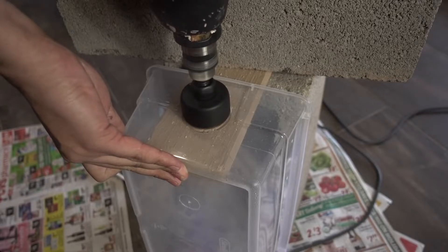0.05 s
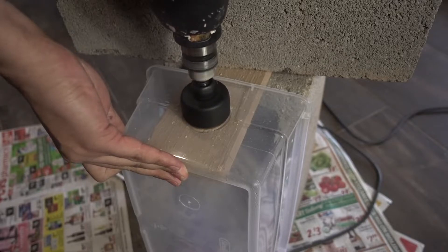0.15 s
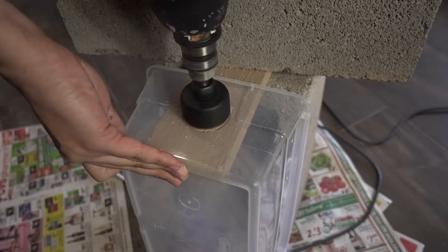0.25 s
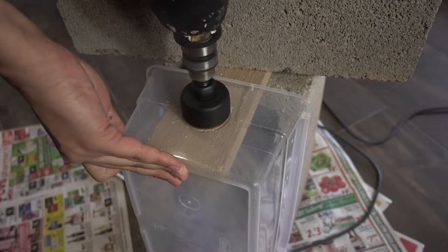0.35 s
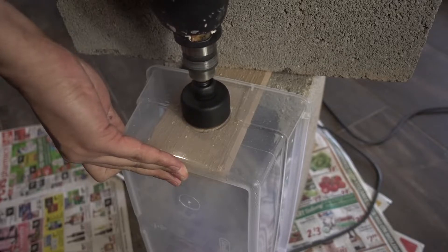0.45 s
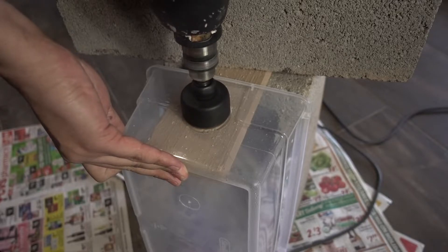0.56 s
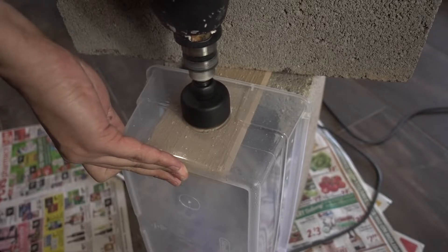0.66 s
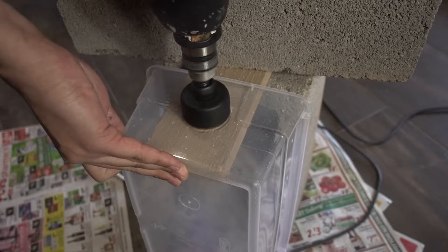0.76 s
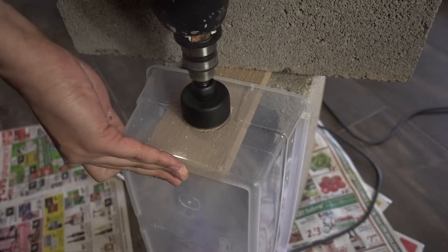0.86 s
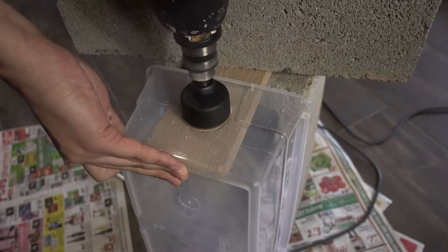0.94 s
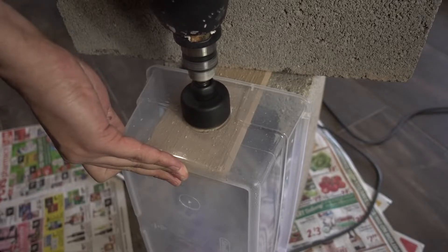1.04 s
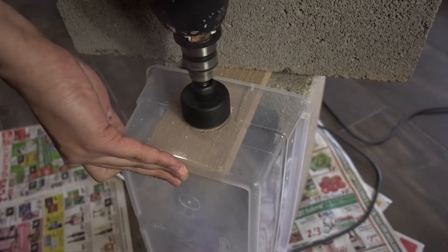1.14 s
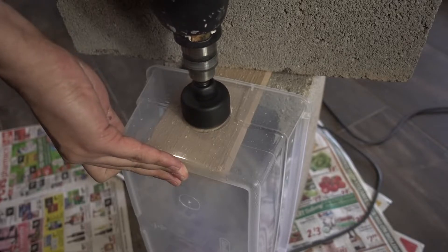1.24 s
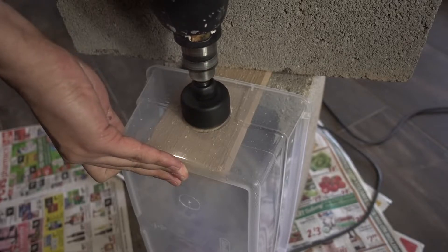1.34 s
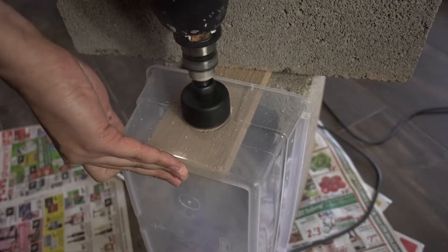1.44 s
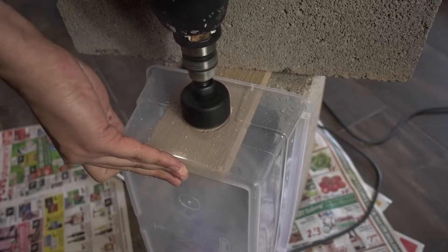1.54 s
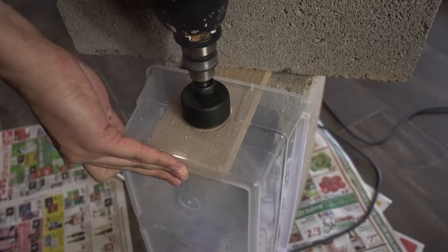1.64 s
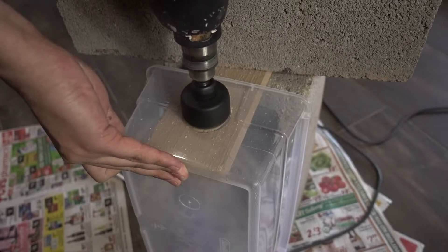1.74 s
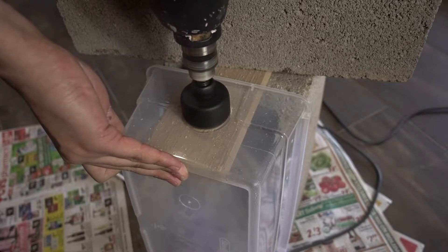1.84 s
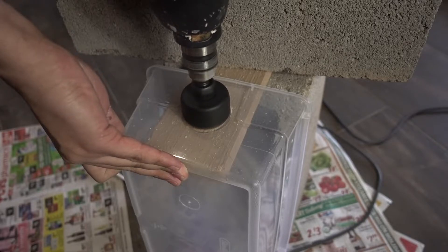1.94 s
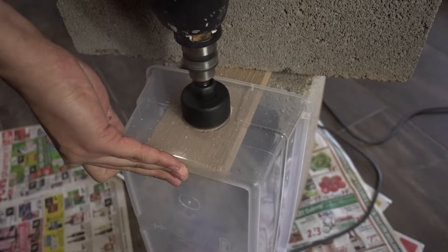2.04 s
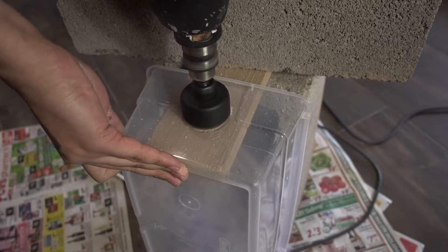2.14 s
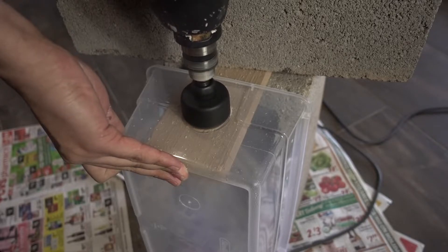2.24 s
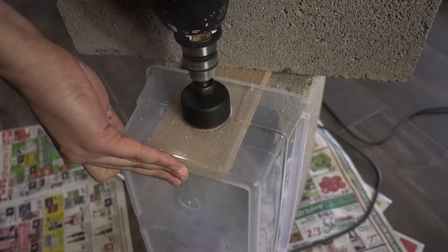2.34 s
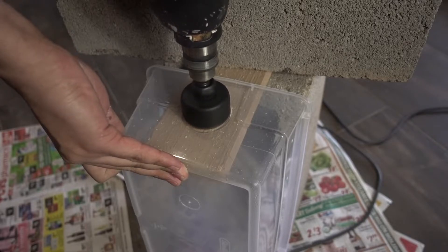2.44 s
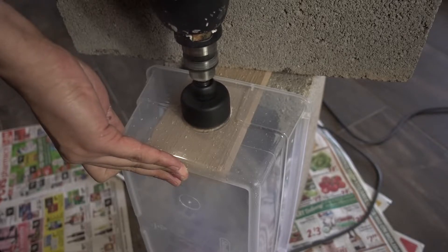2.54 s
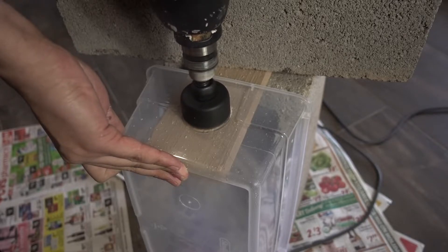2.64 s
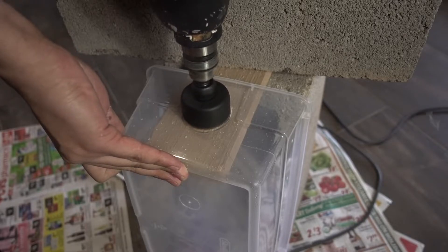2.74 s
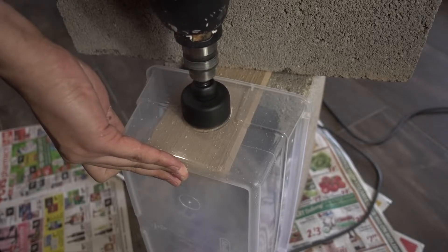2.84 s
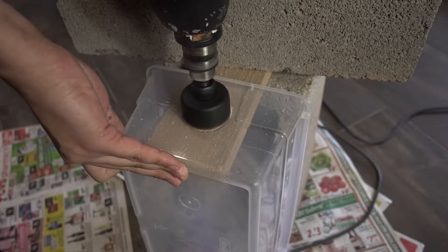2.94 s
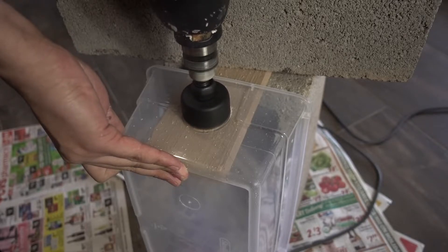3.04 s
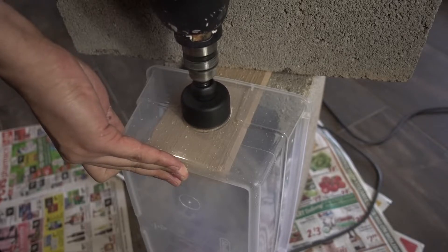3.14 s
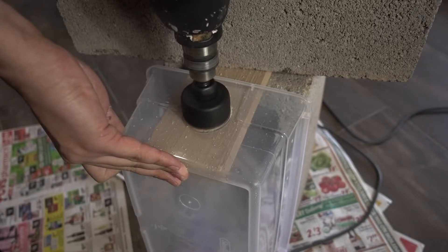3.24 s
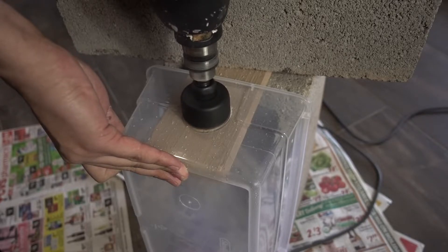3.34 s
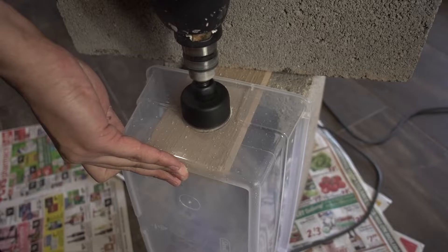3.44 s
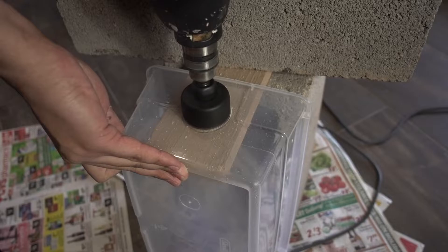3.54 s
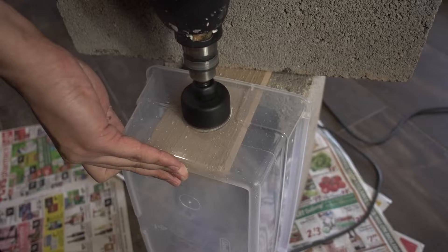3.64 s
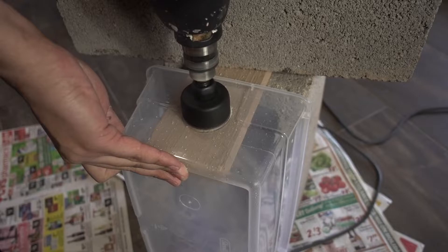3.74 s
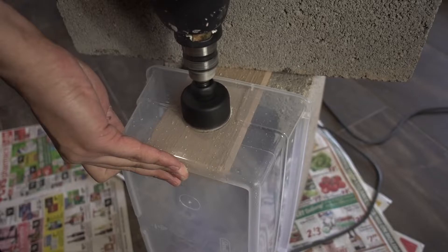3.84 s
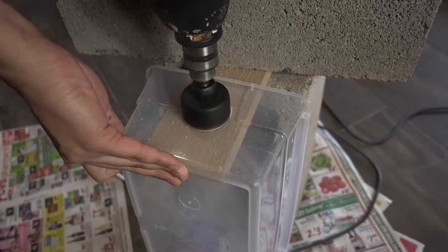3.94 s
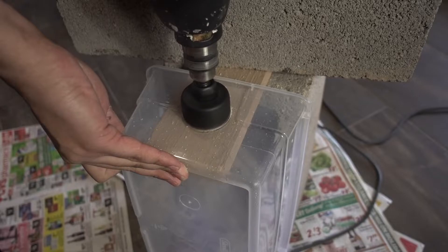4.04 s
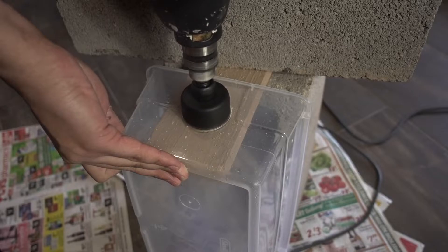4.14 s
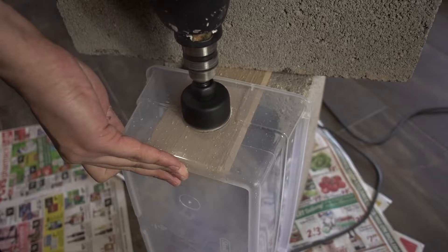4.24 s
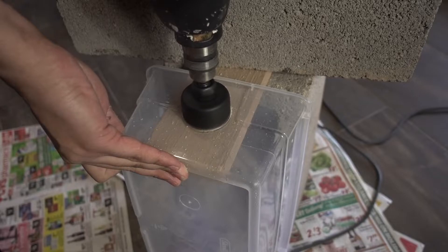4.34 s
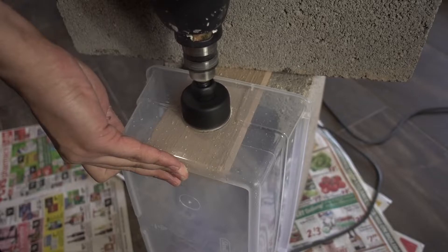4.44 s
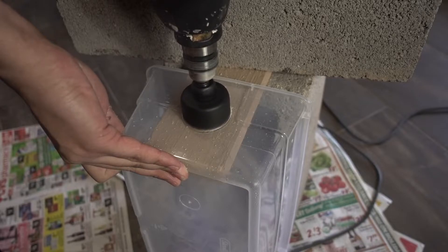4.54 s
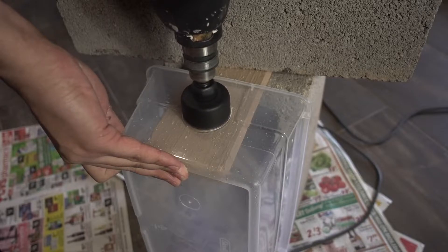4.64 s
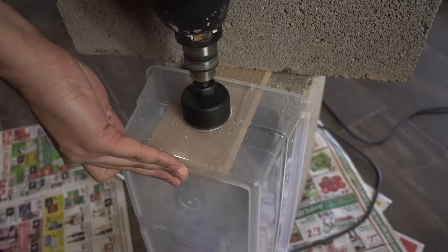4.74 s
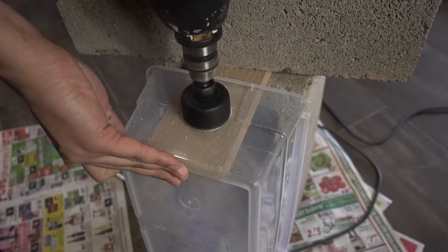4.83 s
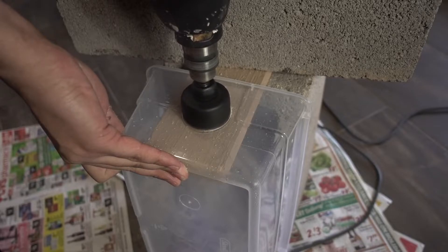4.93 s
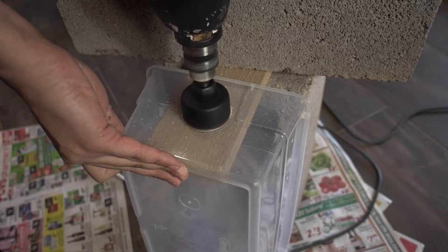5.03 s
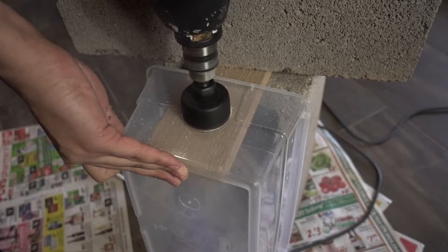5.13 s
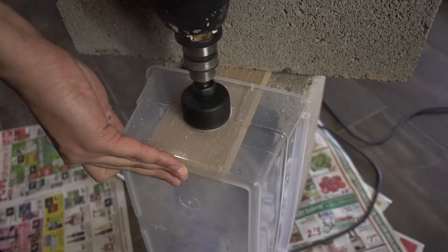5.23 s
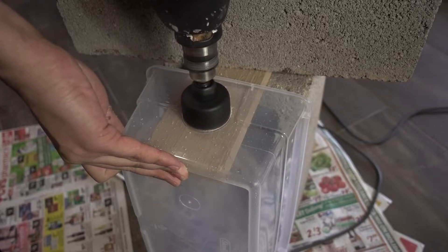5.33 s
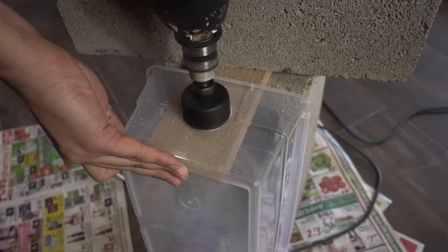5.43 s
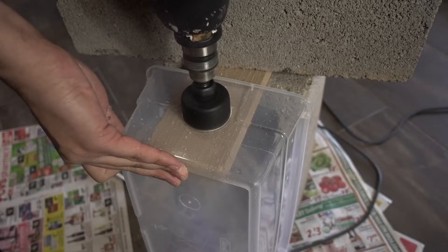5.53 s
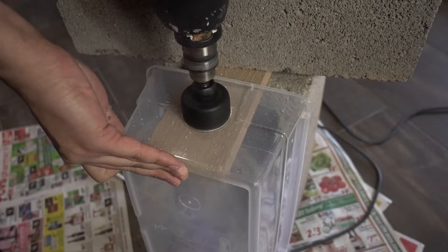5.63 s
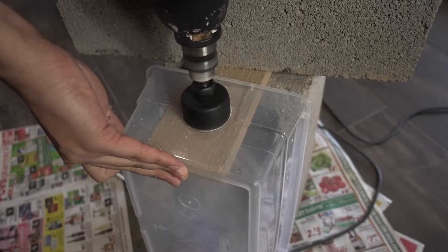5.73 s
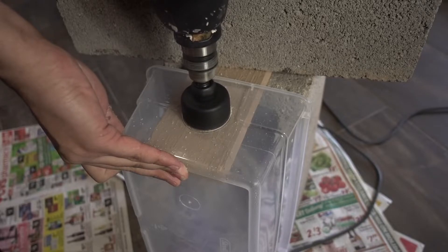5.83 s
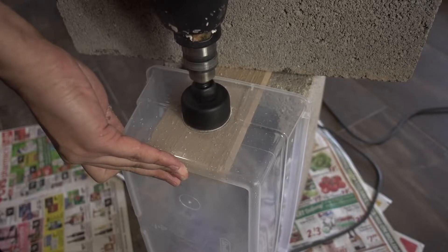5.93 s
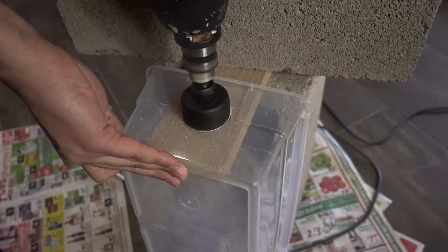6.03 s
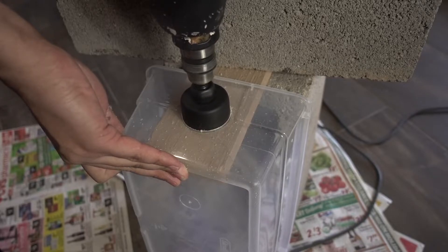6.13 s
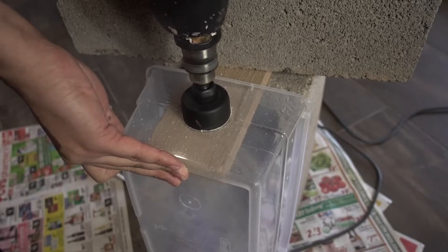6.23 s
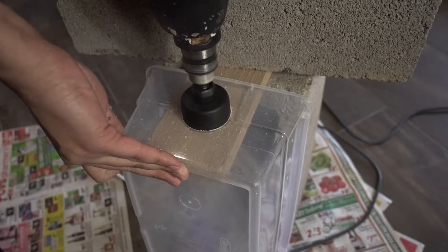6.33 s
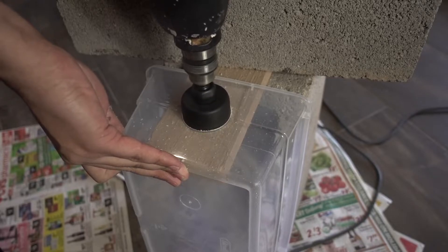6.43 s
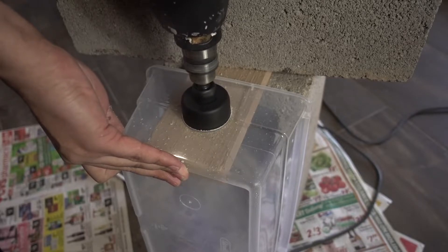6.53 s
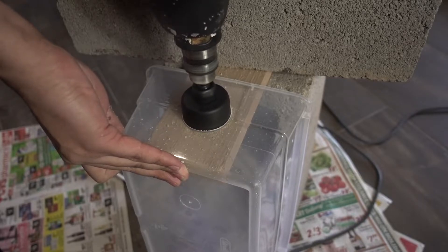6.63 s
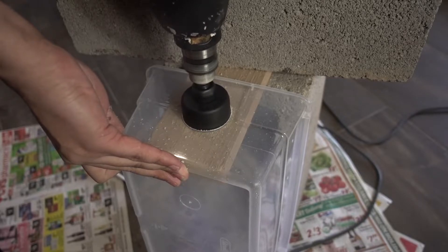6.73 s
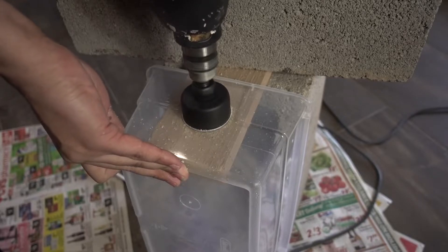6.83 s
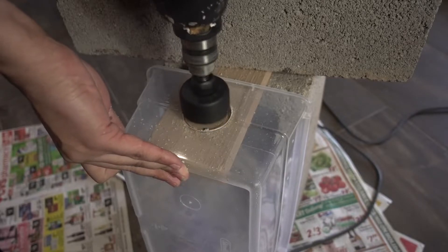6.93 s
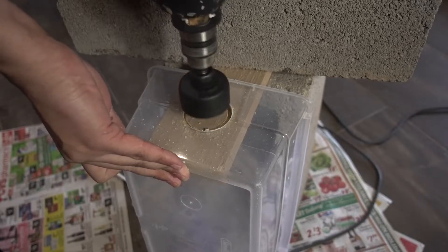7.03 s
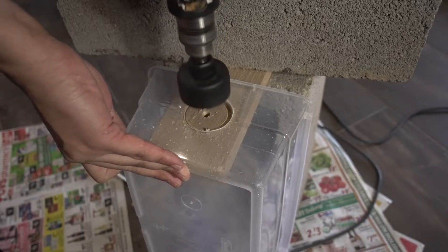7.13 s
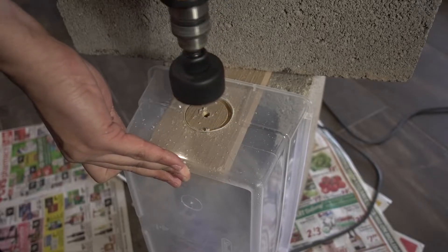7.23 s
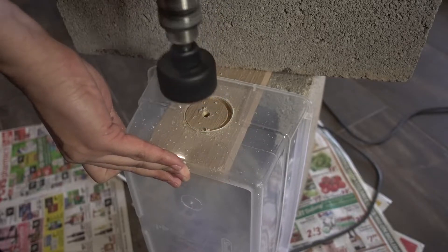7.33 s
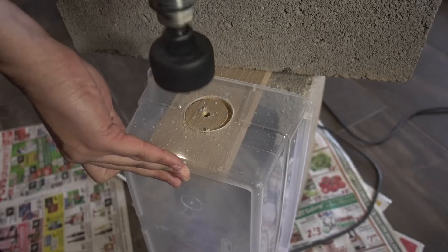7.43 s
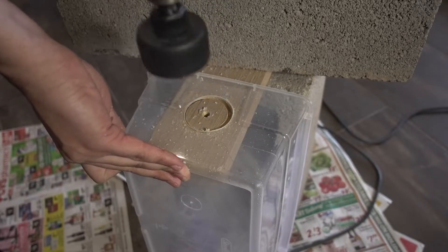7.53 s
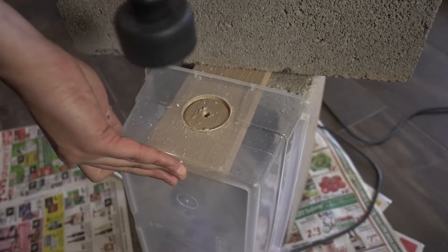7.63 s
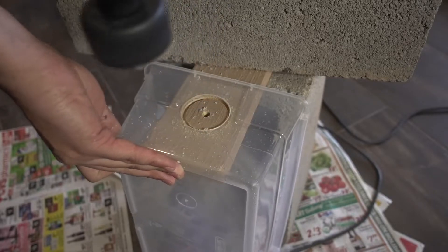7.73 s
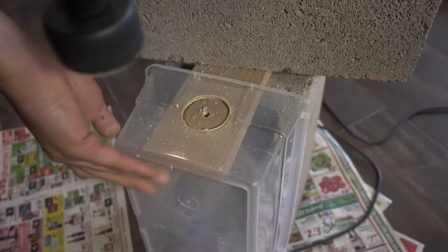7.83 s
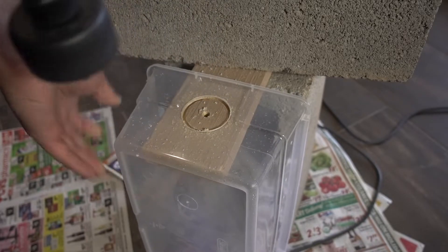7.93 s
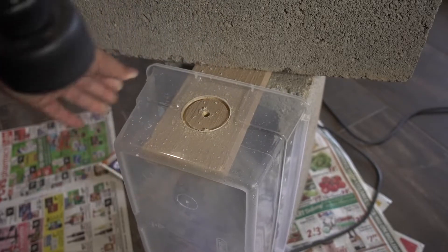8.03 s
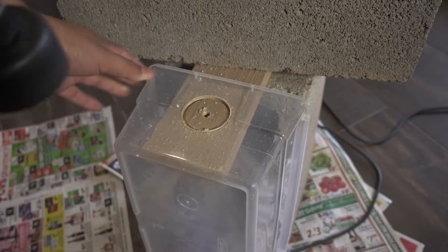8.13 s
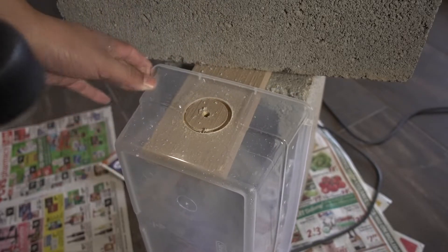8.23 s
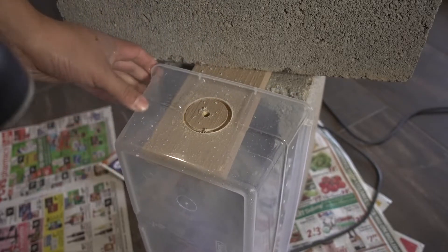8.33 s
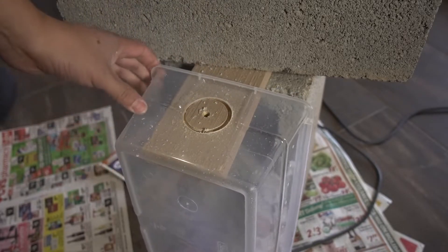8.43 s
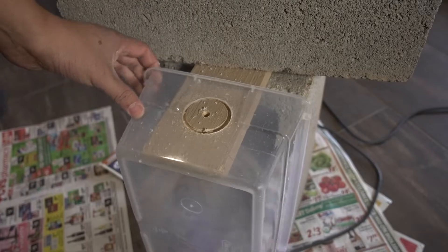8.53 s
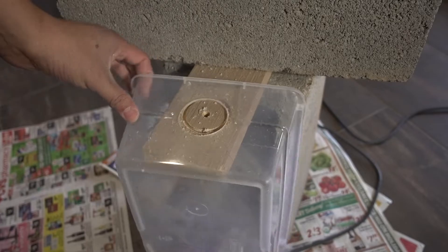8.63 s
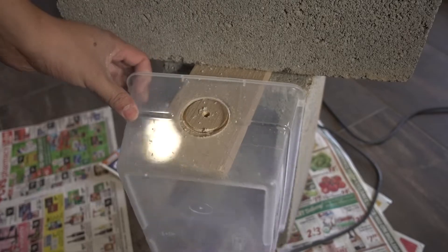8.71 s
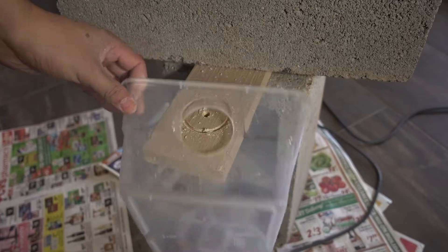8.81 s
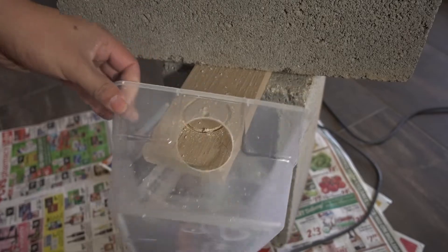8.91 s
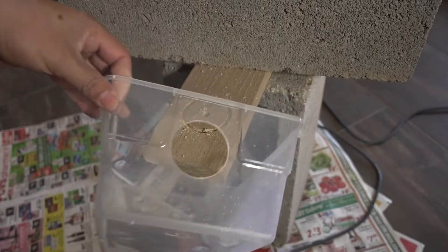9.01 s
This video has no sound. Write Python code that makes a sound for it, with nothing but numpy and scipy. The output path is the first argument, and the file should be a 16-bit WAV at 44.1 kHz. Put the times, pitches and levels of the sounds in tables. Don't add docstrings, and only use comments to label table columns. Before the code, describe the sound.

Close, harsh power-drill whine and hiss under load, breaking through plastic, speeding up, then coasting down leftward into rattling gears and soft box thuds.

```python
import sys
import numpy as np
from scipy import signal
from scipy.fft import rfft, irfft, next_fast_len
from scipy.io import wavfile
from scipy.ndimage import uniform_filter1d, map_coordinates

SR = 44100
rng = np.random.default_rng(int(sys.argv[2]) if len(sys.argv) > 2 else 0)


def file_out(sig):
    cols = np.atleast_2d(sig).T
    lim = np.clip(cols, -1, 1)
    pcm = np.round(lim * 32767).astype(np.int16)
    wavfile.write(sys.argv[1], SR, pcm)


def makeup_ratio(level_db):
    decades = np.asarray(level_db, float) / 20
    return 10 ** decades


N = 399974
FREE_HZ = 403
THROUGH_S, RELEASE_S = 6.17, 7.205
TOP_HZ = 15780


def drill():
    speed = armature()
    turns = np.cumsum(speed) / SR
    tones = unbalance(turns) + third_order(turns) + pinion_mesh(turns)
    tones = tones + armature_slots(speed, turns) + brush_whistles(speed, turns)
    return placed(motor_noise(speed, turns) + tones + gear_clacks() + bearing_chirps())


# (time [s], speed [turns/s])
POWERED_SPEED = [(0.0, 380.3), (0.8, 371.3), (1.2, 366.2), (1.6, 365.3), (2.3, 358.0), (2.7, 358.7),
                 (3.1, 362.3), (4.3, 354.8), (5.0, 349.2), (5.3, 354.7), (5.6, 352.6), (6.05, 342.6),
                 (6.17, 334.6), (6.3, 336.9), (6.45, 350.5), (7.0, 398.0), (7.17, 403.1)]


def powered_speed():
    return curves(POWERED_SPEED)[0]


def armature():
    drag_hz, coast_per_s = 284, .377
    angle = np.arctan(FREE_HZ / drag_hz) - coast_per_s * coasted()
    return np.minimum(powered_speed(), drag_hz * np.tan(angle))


def sag():
    return FREE_HZ - powered_speed()


def coasted():
    return np.clip(np.arange(N) / SR - RELEASE_S, 0, None)


def field_gone():
    return np.clip(coasted() - 0.23, 0, None)


def tone_fade_db():
    return 24.5 * field_gone()


# (time [s], level [dB])
BOX_SHAKE = [(0, 2.5), (.6, 4.5), (1.3, 2.5), (2, 0.33), (3.4, -3), (4.2, -1.5), (5.2, .9), (5.8, 1.5),
             (6.3, 1.7), (7.2, -0.5)]


def shake_db():
    return curves(BOX_SHAKE)[0]


def unbalance(turns):
    snag_db = 9 * bump(THROUGH_S, 0.16)
    level_db = -48 + 0.57 * shake_db() - snag_db - 76.5 * coasted()
    return makeup_ratio(level_db) * tone(turns, unsteady_db=1.4, spread=0.37)


def third_order(turns):
    loaded_db = -40.5 - 1.03 * shake_db()
    level_db = blend(loaded_db, -35.5, ramp(THROUGH_S + .5, .22)) - 110 * field_gone()
    rough = 1 + .7 * wobble(90)
    return makeup_ratio(level_db) * rough * tone(3 * turns, unsteady_db=1.8, spread=.2, blur=.12)


# (multiple of the speed [1], level [dB])
MESH_SIDEBANDS = [(2, -14), (4, -5), (5, 0.5), (7, -0.5), (8, -5), (9, -12), (10, -11), (13, -14),
                  (17, -16), (19, -13), (22, -9)]


def pinion_mesh(turns):
    mesh_db = blend(-44.5 + .36 * sag(), -50, ramp(THROUGH_S - .04, .7)) - tone_fade_db()
    side_db = blend(-33 + .055 * sag(), -47, ramp(THROUGH_S - .25, 0.31)) - tone_fade_db()
    out = makeup_ratio(mesh_db) * (1 + .3 * wobble(60)) * tone(6 * turns, unsteady_db=1.2, spread=0.3)
    third = tone(18 * turns, unsteady_db=2, spread=.3, blur=.15)
    out += makeup_ratio(np.minimum(mesh_db, -27) - 7.5) * (1 + .6 * wobble(120)) * third
    sidebands = sum(makeup_ratio(db) * tone(round(k) * turns, unsteady_db=1.6, spread=.25, blur=.04)
                    for k, db in MESH_SIDEBANDS)
    return out + makeup_ratio(side_db) * sidebands


def armature_slots(speed, turns):
    slots, blades = 12, 21
    loaded_db = -31.5 + 0.231 * np.clip(sag() - 35, 0, None)
    level_db = blend(loaded_db, -29, ramp(THROUGH_S - .04, 0.089))
    level_db = level_db - 13 * np.clip(field_gone() / .12, 0, 1) - tone_fade_db()
    level_db -= np.clip(slots * speed - 4420, 0, None) / 100 * ramp(THROUGH_S, .1)
    out = makeup_ratio(level_db - 1.5) * tone(slots * turns, unsteady_db=2.2, spread=.3, blur=.14)
    common = wobble(260) + 0.64 * wobble(230)
    opposed = wobble(260) * 0.36 * np.array([[1], [-1]])
    out += makeup_ratio(level_db + 1.0) * (common + opposed) * np.sin(2 * np.pi * slots * turns)
    return out + makeup_ratio(level_db - 5) * wobble(160) * np.sin(2 * np.pi * blades * turns)


# (frequency [Hz], level [dB])
HOUSING_RADIATION = [(7000, -30), (10000, -15), (12000, -8), (13600, -2), (15000, 0), (16000, 0)]


def brush_whistles(speed, turns):
    level_db = -40 - .2 * np.clip(150 - speed, 0, None)
    out = 0
    for k in 12 * np.arange(3, 13):
        hz = k * speed
        rasp = 1 + .6 * (speed > 380) - sag() / 70 + .5 * wobble(200) + sag() / 25 * wobble(500)
        gain = makeup_ratio(level_db + along(HOUSING_RADIATION, hz)) * (hz < TOP_HZ)
        out = out + gain * rasp * tone(k * turns, unsteady_db=1.5, spread=.2, blur=.2)
    return out


def motor_noise(speed, turns):
    chuck = np.sin(2 * np.pi * turns / 17.5)
    shaft = np.sin(2 * np.pi * turns)
    powered = np.arange(N) < RELEASE_S * SR
    mains = np.sin(2 * np.pi * 120 * np.arange(N) / SR) * powered
    chatter = 0.086 * wobble(15) + 0.63 * wobble(45) + 0.387 * wobble(300)
    slack = np.clip(1 - speed / 260, 0, 1)
    rattle = slack * (5 * wobble(1300) + 1.5 * wobble(110))
    saw_db, case_db, fan_db, brush_db = part_levels(speed)
    out = makeup_ratio(saw_db) * saw_teeth(chatter + rattle - 4.02 * slack + 0.27 * chuck + 1.83 * shaft)
    out += makeup_ratio(case_db) * gear_case(chatter + rattle - 7.1 * slack + 0.13 * chuck + 1.0 * mains)
    out += makeup_ratio(fan_db) * fan(1.15 * chatter + .5 * chuck + .5 * mains)
    out += makeup_ratio(brush_db) * brushes(1.32 * chatter + .5 * chuck + 0.65 * mains + 2.0 * shaft)
    return out + motor_shell(speed, chatter + .6 * rattle) + box_panel(speed) + box_shell(speed, chatter)


# (level [dB], load gain [dB per Hz of sag], coasting gain [dB per dB of speed], share of
# nearness [dB/dB], extra yielding while the draught overloads, negative: rising [dB/dB])
PART_LEVELS = [
    (-21, 0.0088, .95, 0.2, -0.06),
    (-21.5, 0.0042, 1.03, 1.725, 0.1359),
    (-22, -0.0182, 1.5, .02, -0.15),
    (-22.5, -0.0709, 1.0472, 0.1, 0.07),
]


def part_levels(speed):
    tear_db = bump(THROUGH_S + 0.18, .12)
    near_db, slow_db, over_db = nearness_db(), slowing_db(speed), overload_db()
    return [db + load * sag() + coast * slow_db + share * near_db + tear_db - hidden * over_db
            for db, load, coast, share, hidden in PART_LEVELS]


# (time [s], nearness [dB])
NEARNESS = [(7.2, -0.5), (7.5, 2), (7.9, 3), (8.2, 4.5), (8.5, 3.5), (8.7, 2), (9.07, 0.48)]


def nearness_db():
    return curves(NEARNESS)[0]


def slowing_db(speed):
    return 20 * np.log10(speed / powered_speed())


# (frequency [Hz], level [dB])
SAW_SPECTRUM = [(600, -51), (950, -9.5), (1400, -2.5), (2000, -1.5), (2700, -3), (3300, -3), (4000, -15),
                (6000, -72)]


def saw_teeth(pulse_db):
    return rush(colour(SAW_SPECTRUM), makeup_ratio(pulse_db + 0.66 * wobble(30)))


# (frequency [Hz], width [Hz], level [dB])
CASE_MODES = [(3554, 540, -4), (4241, 487, -0.5), (4887, 760, -4.5)]


def gear_case(pulse_db):
    return rush(lambda hz: modes(CASE_MODES)(hz) ** 2, makeup_ratio(pulse_db))


# (frequency [Hz], level [dB])
FAN_SPECTRUM = [(3500, -37.5), (5300, -3.5), (6200, -2), (7000, -3), (7500, -0.5), (8100, -4),
                (10000, -8.5), (12000, -29), (16000, -49)]


def fan(pulse_db):
    return rush(colour(FAN_SPECTRUM), makeup_ratio(pulse_db + 0.22 * wobble(14)))


# (frequency [Hz], level [dB])
BRUSH_SPECTRUM = [(6000, -40), (9000, -6), (10500, 0), (12100, -2.5), (12900, -.5), (13700, -3.5),
                  (14500, -2), (16000, -3.5)]


def brushes(pulse_db):
    return rush(colour(BRUSH_SPECTRUM), makeup_ratio(pulse_db + 0.26 * wobble(12)))


# (frequency [Hz], width [Hz], level [dB])
SHELL_MODES = [(330, 240, -5), (1400, 700, 1.5), (5600, 1270, 0.5)]


def motor_shell(speed, pulse_db):
    level_db = -31 - 30 * (1 - ramp(6.75, 0.26)) + 1.24 * slowing_db(speed) + 1.01 * nearness_db()
    return makeup_ratio(level_db) * rush(lambda hz: modes(SHELL_MODES)(hz) ** 2, makeup_ratio(pulse_db))


# (frequency [Hz], level [dB])
PANEL_SPECTRUM = [(20, -32), (60, -28), (110, -17), (200, -6), (262, -6), (282, 4), (302, -7), (400, -15),
                  (700, -50)]


def box_panel(speed):
    deep = ramp(4.27, .9) - ramp(THROUGH_S + .5, 0.49)
    level_db = -64 + 7.5 * deep + .3 * shake_db() + 1.4 * slowing_db(speed) + .9 * nearness_db()
    return makeup_ratio(level_db) * rush(colour(PANEL_SPECTRUM), makeup_ratio(0.94 * wobble(16)))


# (frequency [Hz], level [dB])
BOX_SPECTRUM = [(100, -65), (250, -22), (450, -5), (700, 5.5), (1000, 3), (1400, -9), (2200, -56)]


def box_shell(speed, chatter):
    level_db = -33 + shake_db() + 1.45 * slowing_db(speed) + 1.5 * nearness_db()
    return makeup_ratio(level_db) * rush(colour(BOX_SPECTRUM), makeup_ratio(2.0 * chatter))


# (time [s], peak level [dB], pitch [Hz])
GEAR_CLACKS = [(8.2254, -14, 4000), (8.2846, -17, 4270), (8.3402, -13.5, 3570), (8.4394, -14, 2490),
               (8.4946, -26, 3530), (8.5244, -28.5, 4060), (8.573, -11, 3550), (8.6073, -14, 2680),
               (8.694, -17, 3580), (8.7375, -17.5, 2020), (8.7574, -21, 3670), (8.7764, -26, 1950),
               (8.7814, -17.5, 4290), (8.8024, -15, 2210), (8.8308, -28, 1960), (8.8608, -19.5, 2600),
               (8.893, -17.5, 2290), (8.904, -23.5, 1480), (8.9371, -17.5, 2530), (8.943, -23, 1430),
               (8.97, -17, 1470), (8.993, -16, 1550), (9.0224, -29, 1520), (9.0523, -25.5, 2080)]


def gear_clacks():
    def plate(hz):
        return (1j * hz / 800 / (1 + 1j * hz / 800)) ** 4 / (1 + (hz / 6000) ** 4)
    return 1.5 * filtered(pings(GEAR_CLACKS, t60=.007, crack=.9, attack=.0001), plate)


# (time [s], peak level [dB], pitch [Hz])
BEARING_CHIRPS = [(8.6058, -24, 14000), (8.756, -26, 13200), (8.768, -12.5, 13100), (8.7959, -8, 12700),
                  (8.8253, -9, 12900), (8.8443, -11, 13100), (8.8747, -22, 13100), (8.8852, -7, 13000),
                  (8.9281, -6, 13100), (8.9404, -14, 12800), (8.9915, -17, 13500)]


def bearing_chirps():
    return .5 * pings(BEARING_CHIRPS, t60=.008, crack=.03, attack=.001)


# (time [s], left minus right [dB], left lag [s])
DRILL_PLACE = [(0, .8, 0), (7, .8, 0), (7.5, 1.8, 0), (8, 6, -.00005), (8.5, 7, -.00009),
               (9.07, 6.5, -.00009)]


def placed(x):
    pan_db, lag = curves(DRILL_PLACE)
    late = np.clip(np.arange(N) + np.round(lag * SR).astype(int), 0, N - 1)
    middle = filtered(x, lambda hz: 1 / (1 + (400 / (hz + 1)) ** 2) / (1 + (hz / 10000) ** 4))
    x = x + middle * (makeup_ratio([pan_db / 2, -pan_db / 2]) - 1)
    return np.array([x[0], x[1][late]])


# (frequency [Hz], level [dB])
PORT_SPECTRUM = [(15, -60), (30, -34), (70, -18.5), (150, -9), (300, 0), (600, 2), (1200, 1), (2200, -11.5),
                 (3500, -60)]


def draught():
    lumps = makeup_ratio(1.8 * wobble(70) + 1.8 * np.array([wobble(90), wobble(90)]))
    likeness = [(60, .94), (180, 0.8), (500, 0.27), (1200, 0.097)]  # (Hz, left-right likeness)
    level_db = draught_db() + 8 + 0.76 * lumps_db()
    return makeup_ratio(level_db) * rush(colour(PORT_SPECTRUM), lumps, alike=likeness)


# (time [s], level [dB])
COOLING_AIR = [(7.495, -58.5), (7.535, -26.5), (7.6, -22.5), (7.82, -24), (7.94, -32), (7.985, -40),
               (8.03, -62)]
# (time [s], peak level [dB], length [s])
AIR_WISPS = [
    (7.375, -40, 0.0195),
    (7.463, -35, 0.0266),
]


def draught_db():
    gust_db, = curves([(7.3, -100)] + list(COOLING_AIR) + [(8.15, -100)])
    wisps = sum(makeup_ratio(db) * bump(s, length) for s, db, length in AIR_WISPS)
    return 20 * np.log10(makeup_ratio(gust_db) + wisps)


# (time [s], depth [dB], length [s])
PRESSURE_LUMPS = [
    (7.61, 3, .008),
    (7.64, 2, .008),
    (7.672, 7, .01),
    (7.724, 11, .013),
    (7.765, 5, .01),
    (7.79, 4, .01),
    (7.83, 5, .015),
]


def lumps_db():
    return sum(db * bump(s, length) for s, db, length in PRESSURE_LUMPS)


def overload_db():
    return uniform_filter1d(np.clip(draught_db() + 36, 0, None), size=2205)


# (time [s], peak level [dB], decay to -60 dB [s])
BOX_BUMPS = [
    (4.38, -46, .08),
    (6.9, -29.5, 0.084),
    (8.845, -34.5, 0.21),
    (8.91, -38, .08),
    (9.05, -48, .1),
]
# (frequency [Hz], width [Hz], level [dB])
WALL_MODES = [(130, 80, -23), (280, 124, 1), (520, 220, 2), (900, 300, -8.5)]


def bumps():
    push, t = np.zeros(N + SR), np.arange(SR // 5) / SR
    for s, db, t60 in BOX_BUMPS:
        push[round(s * SR):][:len(t)] += makeup_ratio(db + 11.0 - 60 * t / t60) * rng.standard_normal(len(t))
    return filtered(push[:N], modes(WALL_MODES))


def pings(rows, t60, crack, attack):
    out, t = np.zeros(N + SR), np.arange(SR // 20) / SR
    for s, db, hz in rows:
        ring = np.sin(2 * np.pi * hz * t) + crack * rng.standard_normal(len(t))
        out[round(s * SR):][:len(t)] += makeup_ratio(db + 4 - 60 * t / t60) * (1 - np.exp(-t / attack)) * ring
    return out[:N]


def tone(turns, unsteady_db, spread, blur=0.075):
    phase = 2 * np.pi * (turns + blur * wobble(30)) + rng.uniform(0, 2 * np.pi)
    lead = spread * rng.standard_normal()
    return np.sqrt(2) * makeup_ratio(unsteady_db * wobble(18)) * np.sin([phase + lead, phase - lead])


# (frequency [Hz], correlation [1])
PORT_LIKENESS = [(60, 0.99), (150, 0.955), (380, 1), (950, 0.97), (2380, 0.89), (5980, 0.73), (15000, 0.68)]


def rush(response, drive, alike=PORT_LIKENESS):
    def shares(hz):
        turn = np.arccos(np.clip(along(alike, hz), -1, 1)) / 2
        return response(hz) * [np.cos(turn), np.sin(turn)]
    mid, side = filtered(drive * rng.standard_normal((2, N)), shares)
    return unit(np.array([mid + side, mid - side]))


def modes(rows):
    def response(f):
        return sum((-1) ** k * makeup_ratio(db) * 1j * f * width / (centre * centre - f * f + 1j * f * width)
                   for k, (centre, width, db) in enumerate(rows))
    return response


def colour(points):
    return lambda hz: makeup_ratio(along(points, hz))


def filtered(x, response):
    m = next_fast_len(N + 8192)
    return irfft(rfft(x, m) * response(np.fft.rfftfreq(m, 1 / SR)), m)[..., :N]


def unit(x):
    return x / np.sqrt(np.mean(x ** 2) + 1e-20)


def along(points, hz):
    f, v = np.transpose(points)
    return np.interp(np.log(hz + 1), np.log(f + 1), v)


def curves(rows):
    s, *columns = np.transpose(rows)
    return [np.interp(np.arange(N) / SR, s, column) for column in columns]


def wobble(rate):
    knots = rng.standard_normal(int(N * rate / SR) + 4)
    return map_coordinates(knots, [np.arange(N) * rate / SR], order=1)


def ramp(start_s, length_s):
    return np.clip((np.arange(N) / SR - start_s) / length_s, 0, 1)


def bump(s, length_s):
    return np.exp(-((np.arange(N) / SR - s) / length_s) ** 2)


def blend(first, second, share):
    return first + share * (second - first)


def scene():
    return drill() + draught() + bumps()


def top_cut(x):
    return signal.sosfilt(signal.butter(12, 16250, fs=SR, output="sos"), x)


def record(dry):
    held = dry * makeup_ratio(-lumps_db() - 0.228 * overload_db())
    return top_cut(filtered(held, lambda hz: hz < TOP_HZ))


dry = scene()
out = record(dry)
file_out(out)
```